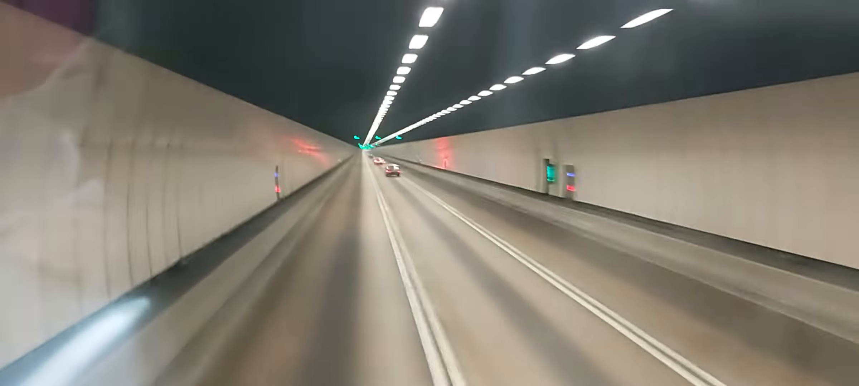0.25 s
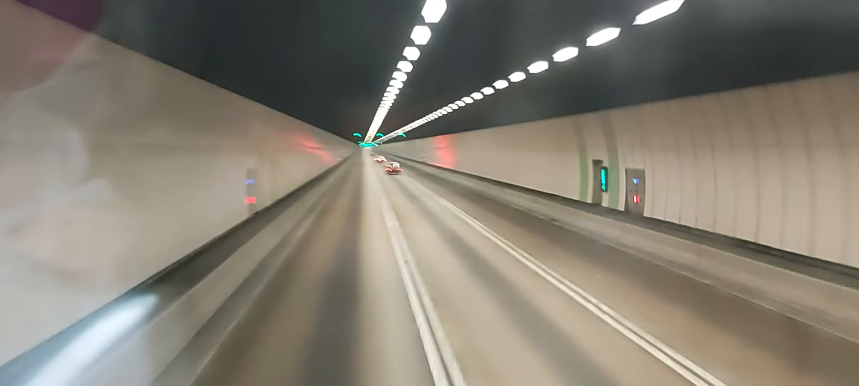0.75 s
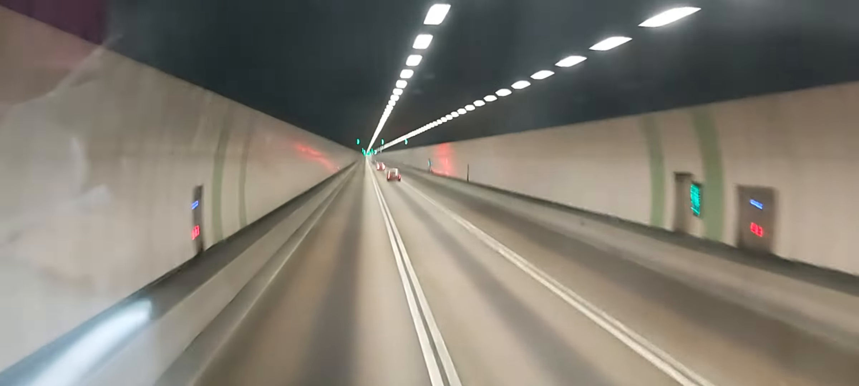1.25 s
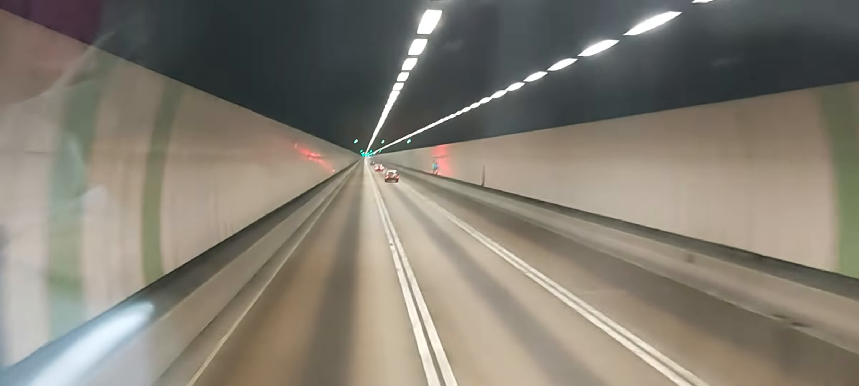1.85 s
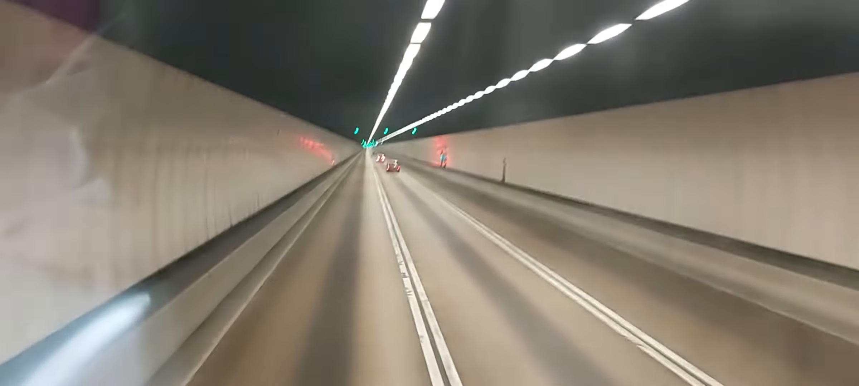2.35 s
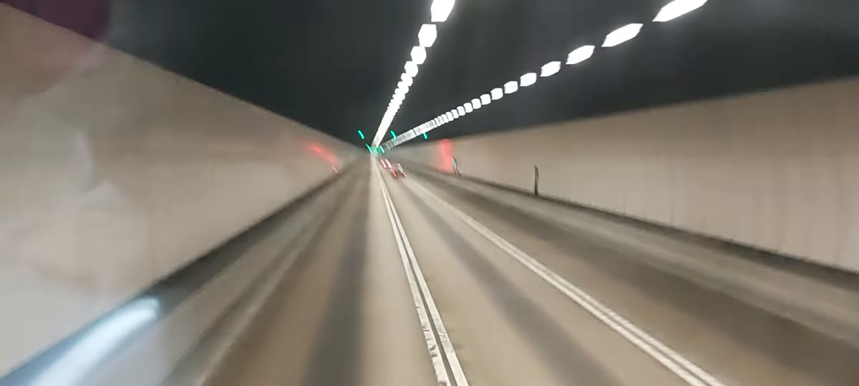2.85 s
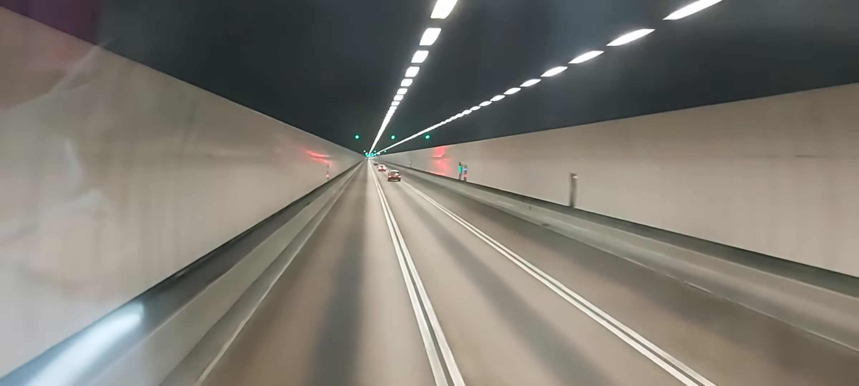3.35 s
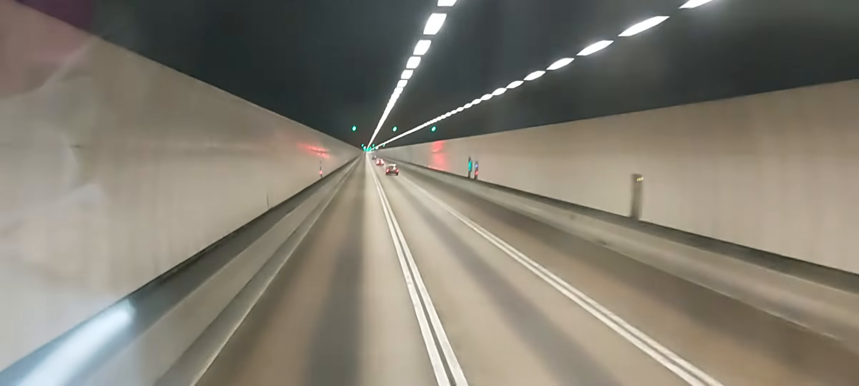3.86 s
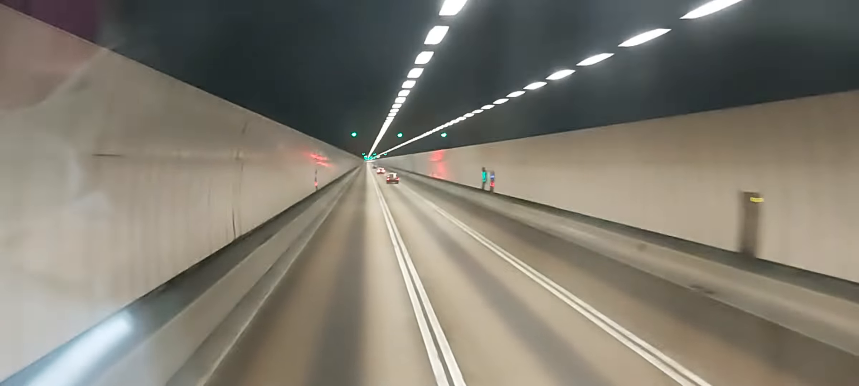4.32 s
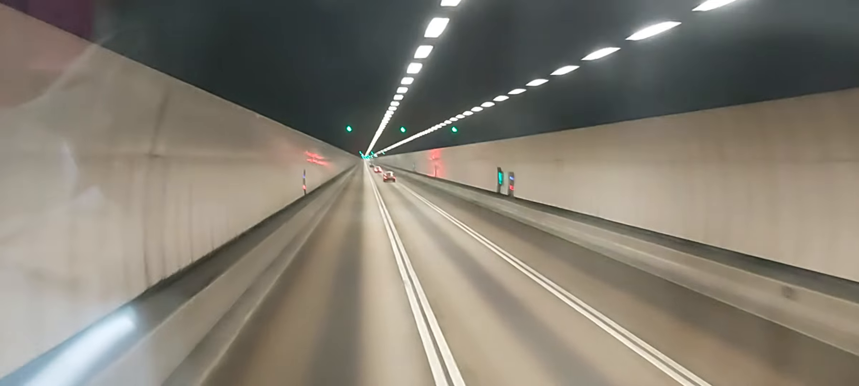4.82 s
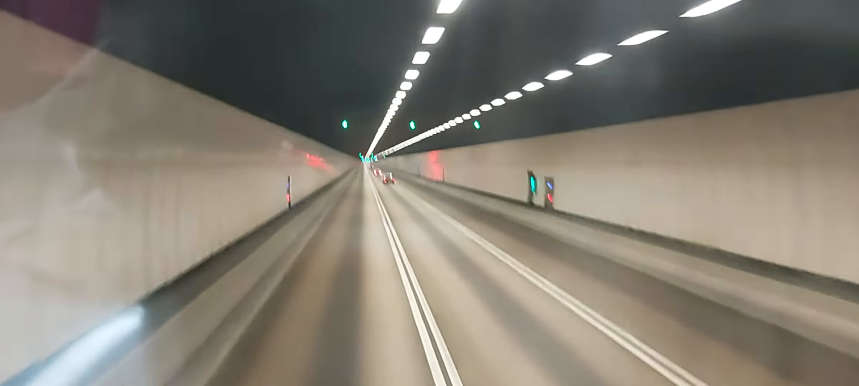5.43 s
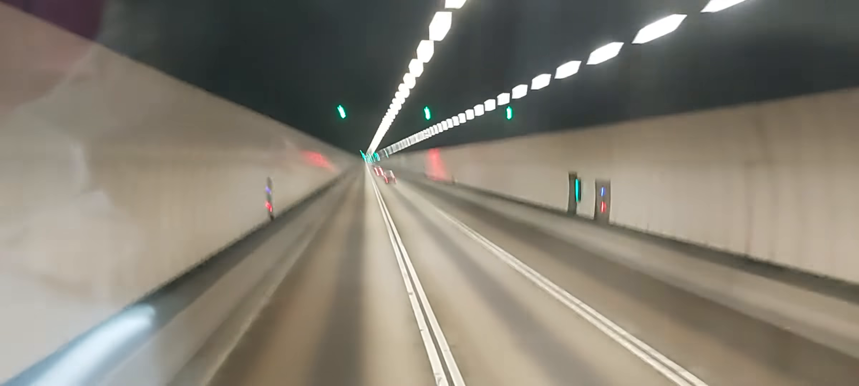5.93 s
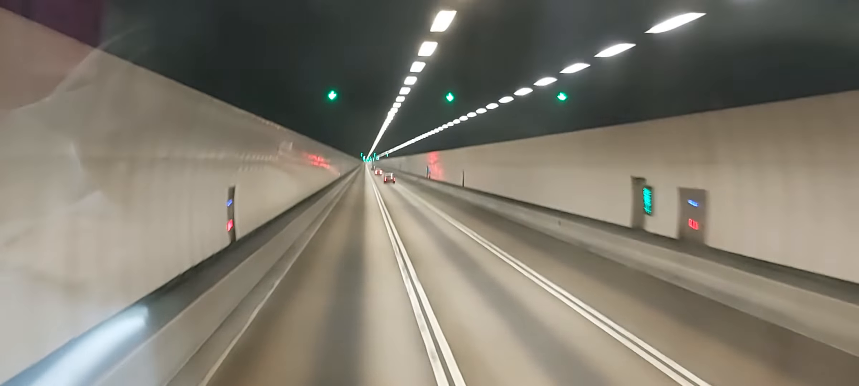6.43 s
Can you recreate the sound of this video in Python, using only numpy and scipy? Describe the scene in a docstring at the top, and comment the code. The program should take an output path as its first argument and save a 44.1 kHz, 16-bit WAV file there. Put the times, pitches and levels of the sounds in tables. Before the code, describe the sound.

Steady low cabin rumble of a car in a road tunnel, engine hum gently swelling, with close fabric rustle and small ticks mostly in the first second.

```python
"""The low boom of the road runs throughout, through the floor of a car cruising in a tunnel, with the engine's hum.
The phone is in the cabin: its two microphone ports hear noise shaped into floor boom, tyre roar off the
tunnel walls and air hiss at the glass; the engine is two tones locked to its firing rate.
Close to the phone, grainy noise makes cloth rustle and ringing bursts tick; thin tones flicker faintly
and one whistles. Road patches set floor panels swelling, and a thin electrical whine stays on top."""
import sys
import numpy as np
from scipy import signal
from scipy.fft import rfft, irfft
from scipy.io import wavfile
from scipy.ndimage import uniform_filter1d

SR = 44100
rng = np.random.default_rng(int(sys.argv[2]) if len(sys.argv) > 2 else 0)


def wav_out(sig):
    """Save sig, one row per channel (or a flat mono array), as 16-bit PCM at SR to the path in sys.argv[1]."""
    wavfile.write(sys.argv[1], SR, np.round(np.clip(np.atleast_2d(sig).T, -1, 1) * 32767).astype(np.int16))


N = 294588

# Levels are those in the cabin, before the microphone ports colour them.
# faint electrical whine: f/Hz, peak level/dB
ELECTRICAL_WHINE = (15625, -85)
# faint wandering whistle: t/s, f/Hz, peak level/dB
WHISTLE_PATH = [(4.58, 3280, -72), (4.64, 3280, -55), (4.69, 3280, -64), (4.78, 3280, -59),
                (4.85, 3250, -54), (4.91, 3260, -63), (5.0, 3290, -65), (5.07, 3300, -56.5),
                (5.13, 3280, -61), (5.2, 3240, -55.5), (5.25, 3250, -61), (5.3, 3280, -61),
                (5.36, 3280, -58), (5.43, 3280, -72)]
# faint thin flickering tones: start t/s, length/s, f/Hz, pitch shake/Hz, peak level/dB
THIN_TONES = [(2.19, .035, 13500, 200, -66), (3.335, .045, 8850, 60, -63), (3.33, .025, 13000, 250, -63),
              (3.345, .045, 13400, 120, -63), (3.565, .045, 10100, 300, -58.5),
              (3.59, .045, 9800, 300, -59.5), (3.565, .035, 8200, 400, -58), (3.59, .05, 8500, 350, -58),
              (3.857, .04, 8850, 60, -61), (3.85, .04, 13250, 180, -62), (5.25, .045, 3390, 40, -50),
              (5.17, .025, 13500, 120, -60), (5.86, .07, 8900, 300, -62)]
# short snaps close by: t/s, peak level/dB, ring f/Hz, width/Hz, decay to -60 dB/s, left minus right/dB
TICK_EVENTS = [(.207, -39, 12000, 4500, 0.022, 0.1), (.288, -42, 7600, 2500, .02, 2),
               (.289, -42, 12500, 4500, .02, -2), (.632, -41, 12500, 5000, .012, -4),
               (.6455, -33, 7200, 1800, .035, 6), (0.6477, -26, 7600, 1800, .014, -3),
               (.647, -31, 12000, 6000, .022, 0.1), (0.647, -31, 2400, 1600, .015, -4),
               (.6845, -26.5, 7600, 1800, .016, 2), (.960, -31, 1900, 900, .05, 2),
               (.960, -33, 3200, 1200, .045, 0.1), (.963, -38, 5400, 700, .06, 0.1),
               (.967, -33, 2300, 1200, .04, .1), (1.882, -41, 11000, 4500, .012, -3),
               (2.039, -50, 11000, 4500, .015, -1.5), (2.872, -51, 11500, 4500, .015, 3),
               (3.981, -44, 11000, 4500, .012, -1.5), (5.2318, -39, 11000, 4500, .012, -5),
               (5.288, -46, 8600, 3500, .015, -1.5), (5.463, -39, 5500, 1000, .1, 1),
               (5.476, -39, 5300, 1400, .12, 1), (5.466, -33, 3000, 1500, .06, 0.1),
               (5.488, -37, 2600, 1500, .05, .1), (5.655, -40, 10000, 4000, .015, 3),
               (5.7385, -40, 11800, 4500, .015, -3)]
# two long sweeps of cloth past the phone: t/s, body level/dB, crisp edge level/dB
CLOTH_SWEEPS = [(0, -42, -56), (.04, -48, -58), (.08, -48, -51), (.16, -55, -58), (.2, -43, -52),
                (.23, -41.5, -48), (.28, -39, -47), (.32, -36.5, -46), (.35, -40, -47), (.39, -42.5, -52),
                (.43, -43.5, -50.5), (.47, -44, -50), (.55, -43, -50.5), (.6, -45, -53), (.625, -38, -53),
                (.645, -33.5, -40.5), (.69, -36.5, -43.5), (.73, -40.5, -47), (.79, -43, -54),
                (.85, -50, -54), (.93, -49, -56), (1.0, -49, -66), (1.08, -80, -85)]
# smaller movements of cloth near the phone: start t/s, hold/s, body level/dB, crisp edge level/dB
CLOTH_MOVES = [(1.167, .15, -63, -60), (1.68, 0.085, -51, -61), (2.019, .06, -53, -63),
               (2.328, 0.11, -56, -62), (3.298, 0.072, -61, -68), (3.56, 0.18, -54, -62),
               (3.84, 0.036, -57, -65), (3.97, .04, -51, -68), (4.099, 0.84, -70, -64.5),
               (4.974, 0.11, -51, -56), (5.14, 0.31, -57, -61), (5.273, 0.046, -49.5, -58),
               (5.403, 0.44, -53, -57), (5.45, 0.03, -45.5, -68), (5.902, 0.23, -66, -60.5),
               (6.45, 0.24, -55, -65)]
# spectra of the soft body and the crisp edge of cloth: f/Hz, relative level per Hz/dB
CLOTH_BODY_SPECTRUM = [(500, -30), (1000, 5.5), (2000, 7.5), (4000, 5), (6500, -1.5), (9000, -29),
                       (14000, -40)]
CLOTH_EDGE_SPECTRUM = [(4000, -29), (7500, 2), (9000, 1), (12000, 3.5), (14000, -1.5), (16000, -3.5)]
# spectra of air at the glass, tyres and floor: f/Hz, relative level per Hz/dB
HISS_SPECTRUM = [(300, -28), (700, -33), (1200, -1), (1500, -1), (2000, -7), (2700, -13), (3300, -11),
                 (4200, -19), (5000, -22), (6800, -27.5), (8400, -29), (12000, -31), (16000, -39)]
ROAR_SPECTRUM = [(100, -24), (200, -13), (330, -4), (450, -5.5), (650, -4), (860, -5), (1000, -9),
                 (1200, -17.5), (1600, -35), (3000, -82)]
BOOM_SPECTRUM = [(15, -39), (28, -17), (35, -1), (50, -4.5), (60, -6), (75, 0), (90, -0.5), (108, -1),
                 (127, 2.5), (143, 0), (160, -8.5), (185, -13), (205, -7.5), (225, -11), (260, -11.5),
                 (330, -18), (500, -35.5), (1200, -90)]
# cabin resonances that the roar rings: f/Hz, width/Hz, gain/dB
CABIN_RESONANCES = [(492, 13, 4.5), (557, 36, 2.5), (596.6, 22, 4.5), (712.5, 24, 5.5), (762, 19, 6),
                    (847.5, 13.6, 6), (881, 41, 3), (1015, 14, 1)]
# floor panel resonances that the boom rings: f/Hz, width/Hz, gain/dB
FLOOR_RESONANCES = [(33.5, 3, -1), (42.4, 3.5, 3.5), (70, 5, 1.5), (93.2, 3.7, 1.5), (115.5, 3.9, 3),
                    (128.3, 5, 1.5), (143, 2.6, 1.5), (173, 9, 3.5), (205.4, 6.4, 4), (270, 7, 4)]
# road patches that set one floor panel ringing: t at the top/s, f/Hz, rms level at the top/dB, half length/s
ROAD_PATCHES = [(0.106, 125, -15.5, 0.046), (1.3, 117.8, -21.5, 0.077), (1.85, 89.9, -25, .14),
                (2.187, 92, -28, 0.11), (2.653, 128, -22, 0.093), (3.97, 132.6, -23, 0.12),
                (4.2, 116.5, -30, .08), (4.723, 87.1, -21.5, 0.13), (5.035, 127.9, -22.5, .11)]
# engine speed: t/s, firing rate f/Hz
FIRING_RATE = [(0, 62.5), (1.25, 62.7), (2.75, 63.02), (5, 63.58), (6.68, 64.0)]
# firing tone, which swells and sinks about every 1.3 s: t/s, rms level/dB
FIRING_LEVEL = [(0, -25), (.3, -25), (.55, -31), (.75, -22.5), (1.3, -22), (1.55, -29), (2.0, -24),
                (2.4, -20), (2.8, -23), (3.15, -28), (3.5, -21), (3.9, -22.5), (4.35, -29), (4.7, -22),
                (5.3, -21.5), (5.65, -31), (6.1, -21), (6.68, -21.5)]
# tone at four times the firing rate: t/s, rms level/dB
FOURTH_LEVEL = [(0, -36.5), (.6, -35.5), (1.1, -42), (2.2, -31), (3.3, -35), (3.8, -40.5), (4.35, -34.5),
                (4.65, -46), (5.2, -38), (6.68, -40)]
# left minus right of the firing tone and of the fourth order: level/dB each
ENGINE_PAN = (0.6, 8.5)
# how alike the ports hear cabin noise; standing waves flip the sign: f/Hz, correlation
PORT_LIKENESS = [(30, .95), (60, .97), (110, .93), (150, .7), (200, .85), (400, .76), (580, .55), (680, .1),
                 (780, .35), (920, 0), (1150, -.7), (1300, -.8), (1600, -.1), (2050, .65), (2400, 0),
                 (2900, -.25), (3600, 0)]
# colour difference of the two microphone ports: f/Hz, left minus right/dB
PORT_DIFFERENCE = [(60, -2.7), (150, -4), (200, 0), (260, 1.5), (400, -.6), (1900, .3), (2700, -4),
                   (3300, -4), (4200, 3), (5000, .3), (6800, 2), (7500, -3), (8400, -11), (9000, -10),
                   (10500, -5), (15000, -4)]
# resonance of the port inlets: f/Hz, width/Hz, gain/dB
INLET_RESONANCE = [(7470, 1200, 7.5)]

BOOM_DB, ROAR_DB, HISS_DB = -20, -25.5, -42
REST_BODY_DB, REST_EDGE_DB = -49.5, -65  # the faint rubbing that never stops
RUSTLE_RISE_S, RUSTLE_FADE_S = 0.015, 0.12  # fade to -20 dB
WHISTLE_SHAKE_HZ = 28
WOBBLE_RAD, WOBBLE_DB = .2, .8  # engine phase and level
TOP_HZ = 15800  # upper limit of the microphones


def undb(db):
    """dB to amplitude gain."""
    return 10 ** (np.asarray(db) / 20)


def curves(table):
    """Every column of a timed table, interpolated sample by sample."""
    s, *columns = np.transpose(table)
    t = np.arange(N) / SR
    return [np.interp(t, s, column) for column in columns]


def over_hz(table, count=N):
    """A (Hz, value) table interpolated over log frequency on every bin."""
    hz, value = np.transpose(table)
    bins = np.fft.rfftfreq(count, 1 / SR)
    return np.interp(np.log(bins + 1), np.log(hz), value)


def peaks(table, count=N):
    """Gain on every frequency bin of a row of resonances."""
    bins = np.fft.rfftfreq(count, 1 / SR)
    return undb(sum(db / (1 + (2 * (bins - hz) / width) ** 2) for hz, width, db in table))


def walk(rate):
    """Random levels held for 1 / rate s, then smoothed twice; spread near 1."""
    hold = int(SR / rate)
    steps = np.repeat(rng.standard_normal(N // hold + 1), hold)
    smooth = uniform_filter1d(uniform_filter1d(steps, hold), hold)
    return 1.78 * smooth[:N]


def sine(hz):
    """Tone of peak 1 that follows a frequency given for each sample."""
    return np.sin(2 * np.pi * np.cumsum(hz) / SR)


def cabin_noise(colour, grain=1, rings=1):
    """Coloured noise at both ports, rms 1, mixed from shared and opposed parts to set their correlation."""
    mid, side = rfft(grain * rng.standard_normal((2, N)))
    alike = np.clip(over_hz(PORT_LIKENESS), -.99, .99)
    mid = mid * np.sqrt(1 + alike)
    side = side * np.sqrt(1 - alike)
    spectrum = np.array([mid + side, mid - side]) * undb(over_hz(colour)) * rings
    noise = irfft(spectrum, N)
    return noise / np.sqrt(np.mean(noise ** 2))


def electrical_whine():
    """A steady pure tone near the top of hearing."""
    hz, db = ELECTRICAL_WHINE
    return undb(db) * np.sin(2 * np.pi * hz * np.arange(N) / SR)


def whistle():
    """One thin tone with a shaky pitch and a fluttering level."""
    hz, db = curves(WHISTLE_PATH)
    level = undb(db + 2 * walk(30))
    return level * sine(hz + WHISTLE_SHAKE_HZ * walk(150))


def thin_tones():
    """Thin flickering tones that swell and fade; the wider the pitch shakes, the more they blur."""
    out = np.zeros(N)
    shake, flutter = walk(300), walk(40)
    for s, length, hz, shake_hz, db in THIN_TONES:
        i, n = int(s * SR), int(length * SR)
        tone = sine(hz + shake_hz * shake[i:i + n])
        level = undb(db + 1.5 * flutter[i:i + n])
        out[i:i + n] += level * np.sqrt(np.hanning(n)) * tone
    return out


def ticks():
    """Short snaps: decaying bursts of noise that ring round one pitch."""
    out = np.zeros((2, N))
    t = np.arange(4000) / SR
    for s, db, hz, width_hz, decay_s, pan_db in TICK_EVENTS:
        edges = [hz - width_hz / 2, min(hz + width_hz / 2, TOP_HZ)]
        band = signal.butter(2, edges, "bandpass", fs=SR, output="sos")
        burst = rng.standard_normal((2, len(t))) * 1000. ** (-t / decay_s)
        snap = signal.sosfilt(band, burst)
        snap /= np.abs(snap).max()
        i = int(s * SR)
        out[:, i:i + len(t)] += snap * undb([[db + pan_db / 2], [db - pan_db / 2]])
    return out


def rustle():
    """Cloth slips as grainy noise, a soft body and a crisp edge; small moves rise, hold and die away."""
    t = np.arange(N) / SR
    sweep_body_db, sweep_edge_db = curves(CLOTH_SWEEPS)
    # powers add, so twice the dB
    body_power = undb(2 * REST_BODY_DB) + undb(2 * sweep_body_db)
    edge_power = undb(2 * REST_EDGE_DB) + undb(2 * sweep_edge_db)
    for s, hold_s, body_db, edge_db in CLOTH_MOVES:
        rise = np.clip((t - s) / RUSTLE_RISE_S, 0, 1)
        fading_s = np.maximum(t - s - RUSTLE_RISE_S - hold_s, 0)
        shape = rise ** 2 * 100. ** (-fading_s / RUSTLE_FADE_S)
        body_power += shape * undb(2 * body_db)
        edge_power += shape * undb(2 * edge_db)
    # uneven grain in dB, each value held for 40 samples
    slips_db = np.repeat(rng.exponential(size=N // 40 + 1), 40)[:N]
    body = cabin_noise(CLOTH_BODY_SPECTRUM, grain=undb(slips_db))
    edge = cabin_noise(CLOTH_EDGE_SPECTRUM, grain=undb(0.89 * slips_db))
    body = body * np.sqrt(body_power) * undb(0.8 * walk(40))
    edge = edge * np.sqrt(edge_power) * undb(walk(30))
    return body + edge


def air_hiss():
    """Air at the glass: bright noise whose level flickers slowly and quickly."""
    level_db = HISS_DB + 0.6 * walk(2.99) + 0.52 * walk(20)
    return cabin_noise(HISS_SPECTRUM) * undb(level_db)


def tyre_roar():
    """Tyre noise off the tunnel walls that rings the cabin resonances and flickers in level."""
    level_db = ROAR_DB + 0.5 * walk(3.02) + 0.5 * walk(21.97)
    return cabin_noise(ROAR_SPECTRUM, rings=peaks(CABIN_RESONANCES)) * undb(level_db)


def floor_boom():
    """Low road noise that rings the floor panels, with a slight flicker in level."""
    level_db = BOOM_DB + 0.3 * walk(7.4)
    return cabin_noise(BOOM_SPECTRUM, rings=peaks(FLOOR_RESONANCES)) * undb(level_db)


def bumps():
    """Uneven road sets one panel at a time swelling and dying at its own pitch, alike at both ports."""
    t = np.arange(N) / SR
    out = np.zeros(N)
    for s, hz, db, half_s in ROAD_PATCHES:
        swell = np.exp(-((t - s) / half_s) ** 2)
        phase = rng.uniform(0, 2 * np.pi)
        out += undb(db) * np.sqrt(2) * swell * np.sin(2 * np.pi * hz * t + phase)
    return out


def engine():
    """Tones at one and four times the firing rate, both wobbling a little in phase and level."""
    turn = 2 * np.pi * np.cumsum(curves(FIRING_RATE)[0]) / SR
    firing = np.sqrt(2) * np.sin(turn + WOBBLE_RAD * walk(4.06))
    firing *= undb(curves(FIRING_LEVEL)[0] + WOBBLE_DB * walk(3.98))
    fourth = np.sqrt(2) * np.sin(4 * turn + WOBBLE_RAD * walk(6.8))
    fourth *= undb(curves(FOURTH_LEVEL)[0] + WOBBLE_DB * walk(6.7))
    firing_pan_db, fourth_pan_db = ENGINE_PAN
    return (firing * undb([[firing_pan_db / 2], [-firing_pan_db / 2]])
            + fourth * undb([[fourth_pan_db / 2], [-fourth_pan_db / 2]]))


def scene():
    """All sources as they reach the two ports."""
    faint_tones = electrical_whine() + whistle() + thin_tones()
    close_by = ticks() + rustle()
    road = air_hiss() + tyre_roar() + floor_boom() + bumps()
    return faint_tones + close_by + road + engine()


def record(dry):
    """Each microphone port colours the sound; both share an inlet resonance; the top is cut."""
    edge = 4096  # mirrored samples at each end, faded outwards and trimmed off again
    padded = np.pad(dry, ((0, 0), (edge, edge)), "reflect")
    padded = padded * signal.windows.tukey(N + 2 * edge, edge / N)
    size = padded.shape[1]
    tilt_db = over_hz(PORT_DIFFERENCE, count=size) / 2
    port_gain = peaks(INLET_RESONANCE, count=size) * undb([tilt_db, -tilt_db])
    coloured = irfft(rfft(padded) * port_gain, size)
    top_cut = signal.ellip(14, .2, 70, TOP_HZ, fs=SR, output="sos")
    return signal.sosfilt(top_cut, coloured)[:, edge:-edge]


dry = scene()
out = record(dry)
wav_out(out)
```